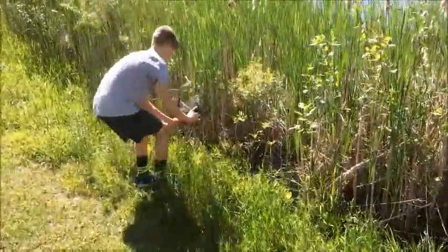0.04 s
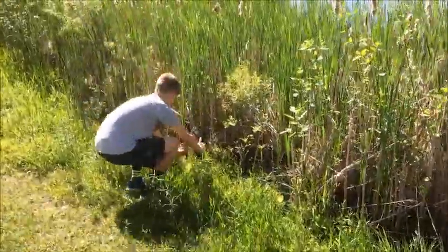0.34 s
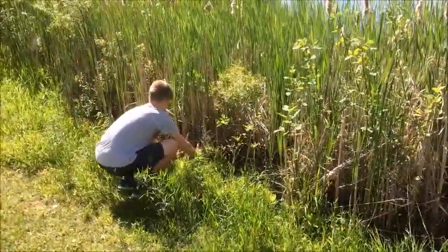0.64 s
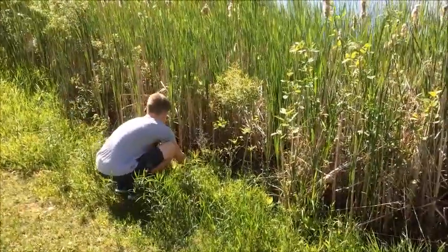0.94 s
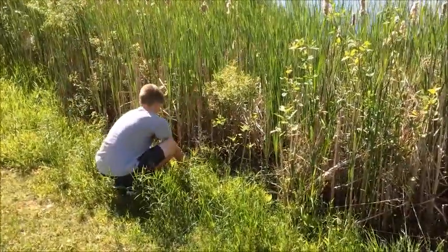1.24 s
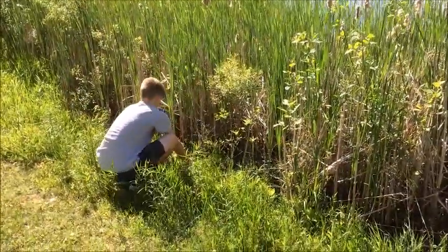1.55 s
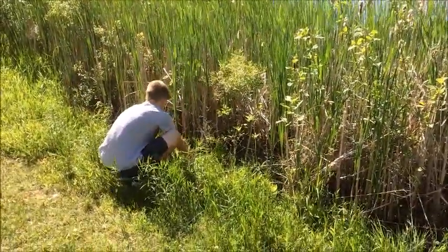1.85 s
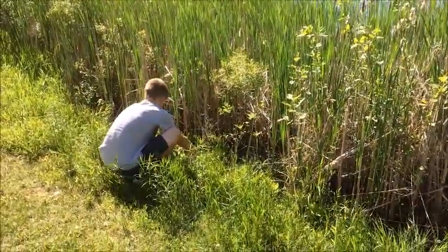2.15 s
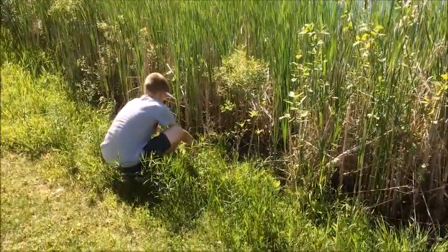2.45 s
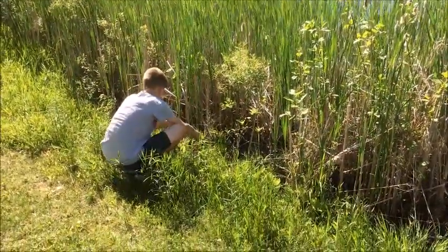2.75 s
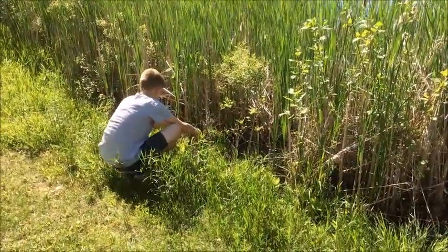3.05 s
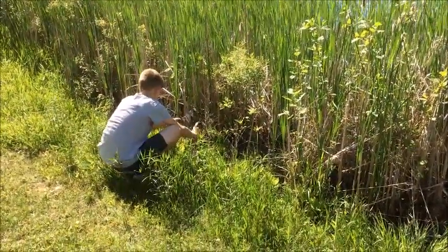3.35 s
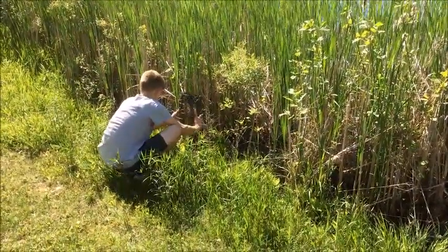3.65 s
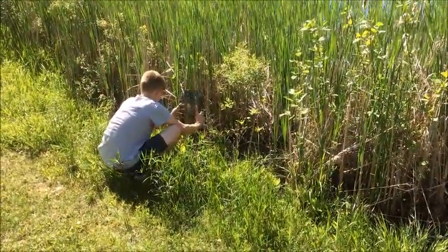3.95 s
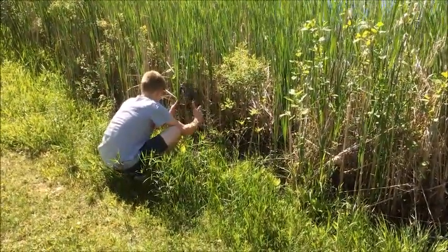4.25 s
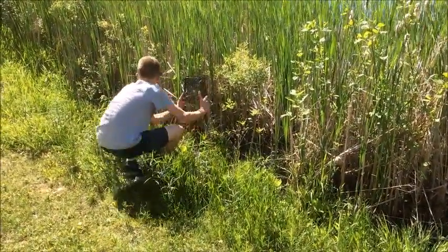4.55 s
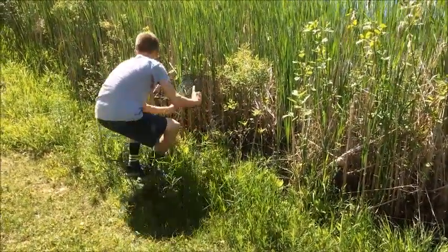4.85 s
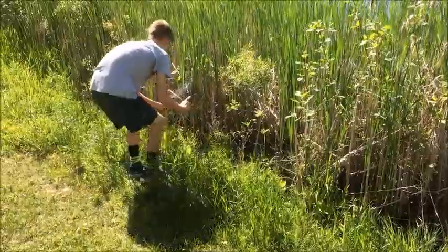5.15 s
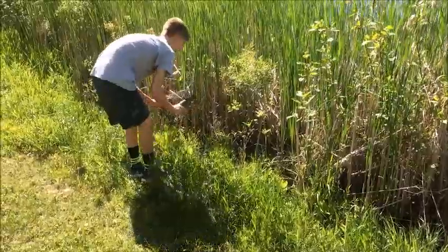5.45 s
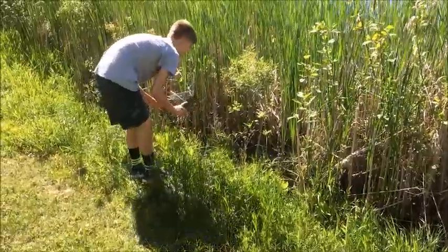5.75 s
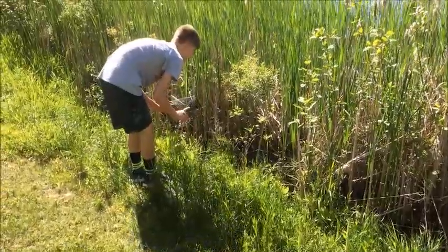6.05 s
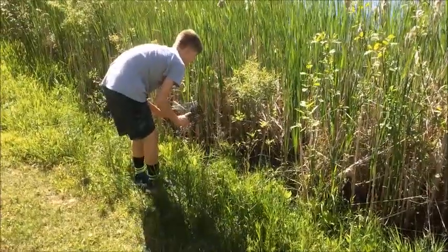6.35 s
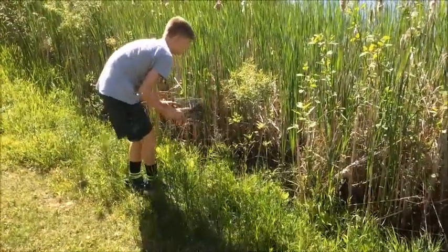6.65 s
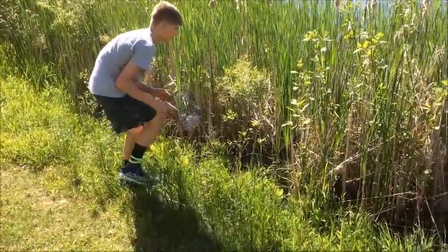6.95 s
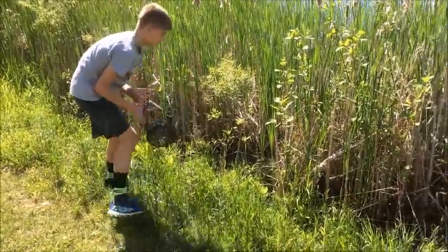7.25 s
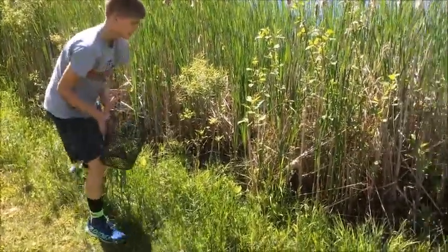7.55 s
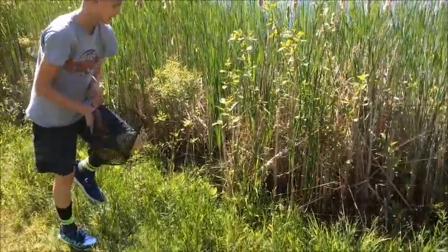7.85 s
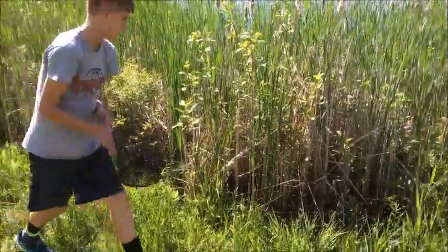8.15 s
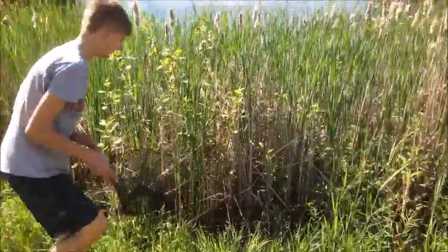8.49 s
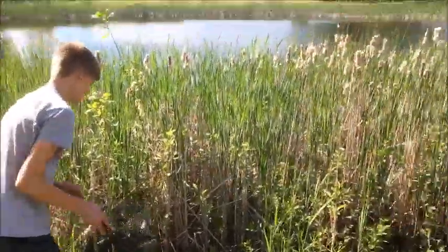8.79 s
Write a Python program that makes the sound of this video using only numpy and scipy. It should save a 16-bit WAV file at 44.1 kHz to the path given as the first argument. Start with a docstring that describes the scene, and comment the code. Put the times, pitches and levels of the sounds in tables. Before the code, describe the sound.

Dry reeds swish and crackle around a net as birds give falling whistles and sharp checks, with light wind on the microphone.

```python
"""At a pond's edge someone works a mesh net out of the reeds: stems swish and snap, a far bird rattles.
Blackbirds cut in with dry 'check' notes and falling alarm whistles that echo off the banks; at 2 s
comes a buzzy trill of fast-repeated syllables. More whistles and a second rattle follow, while a far
hum comes and goes. Past 5 s the breeze bumps the microphone hardest, just before the last two whistles.
Then feet brush through the grass, and a thin, high trill closes the scene."""
import sys
import numpy as np
from scipy import signal
from scipy.fft import rfft, irfft, next_fast_len
from scipy.io import wavfile
from scipy.ndimage import map_coordinates

SR = 44100
rng = np.random.default_rng(int(sys.argv[2]) if len(sys.argv) > 2 else 0)


def file_out(sig):
    """Save sig as 16-bit WAV at sys.argv[1]."""
    # one column per channel
    cols = np.atleast_2d(sig).T
    # limit, then scale
    lim = np.clip(cols, -1, 1)
    pcm = np.round(lim * 32767).astype(np.int16)
    wavfile.write(sys.argv[1], SR, pcm)


N = 393372
TOP_HZ = 15520  # top of the mix
BUZZ_S, THIN_S = .0358, .007  # syllable periods of the buzzy and the thin trill

# alarm whistles: t/s, held f/Hz, plunge depth/Hz, sag/(Hz/s), 2nd partial/dB, 3rd partial/dB,
# water echo delay/s, water echo gain/ratio, send to the far reeds/dB
ALARMS = [(1.181, 3625, 2750, 1034, -46, -39, 0, 0, -16),
          (1.839, 3650, 3500, 1217, -29.5, -32, .00697, 0.78, -22.5),
          (3.077, 3488, 3400, 532, -32, -23.5, 0, 0, -13.5),
          (3.529, 3674, 2800, 1117, -42, -47, 0, 0.33, -14), (5.891, 3600, 3300, 886, -36, -23, 0, 0, -11),
          (6.248, 3661, 3750, 1214, -33, -26.5, .00692, 0.88, -23.5)]
# one envelope per whistle, its last point ending the call: t/s, level/dB
ALARM_ENVELOPES = [
    [(1.181, -50.5), (1.262, -39.5), (1.284, -66), (1.298, -40.5), (1.346, -44), (1.374, -51.5),
     (1.39, -38.5), (1.422, -36.5), (1.44, -43), (1.49, -50)],
    [(1.839, -38), (1.9, -31), (1.95, -32), (2.04, -33.5), (2.14, -37)],
    [(3.076, -51), (3.12, -44), (3.156, -39), (3.168, -44), (3.232, -50), (3.246, -39.5), (3.314, -42),
     (3.325, -48.5), (3.37, -60)],
    [(3.529, -72), (3.556, -53), (3.594, -63), (3.655, -42.5), (3.736, -44), (3.85, -48.5)],
    [(5.892, -55.5), (5.924, -49), (5.945, -44.5), (5.978, -38), (5.996, -55), (6.024, -41), (6.088, -50),
     (6.098, -39.5), (6.165, -43.5)],
    [(6.248, -41.5), (6.275, -35), (6.32, -32.5), (6.43, -34), (6.53, -34.5), (6.558, -40)],
]
# dry 'check' notes: t/s, level/dB
CHECK_CUES = [(0.9164, -32.5), (3.6535, -33.5), (4.6097, -33), (5.36, -53), (5.572, -34), (7.466, -32.5),
              (8.6153, -35)]
# throat resonance of a 'check': f/Hz, level/dB
THROAT_EQ = [(700, -21), (1500, -17.5), (2600, -14), (3300, -7.5), (3750, 2.5), (4350, 2.5), (4750, -12),
             (5200, -10), (5900, -21.5), (13000, -29)]
# clear notes that open a song: t/s, length/s, f/Hz, level/dB
OPENING_NOTES = [(1.655, 0.04, 2058, -50.5), (1.68, 0.033, 2092, -53.5), (1.722, 0.033, 1580, -64),
                 (1.849, 0.044, 1632, -52)]
# trill layers: start/s, end/s, period/s, f/Hz, glide/Hz, rasp/Hz, syllable length/s, level/dB,
# level change over the trill/dB
TRILL_LAYERS = [(1.999, 2.574, BUZZ_S, 3300, -300, 40, 0.019, -38, -10),
                (2.018, 2.59, BUZZ_S, 3400, 0, 60, 0.02, -53, -3),
                (2.039, 2.59, BUZZ_S, 4883, 20, 60, 0.023, -52.5, -0.5),
                (2.02, 2.60, BUZZ_S, 2576, -40, 45, 0.016, -50, -5.5),
                (2.025, 2.603, BUZZ_S, 2845, 100, 131, 0.026, -50.5, -8),
                (8.75, 8.92, THIN_S, 5520, 307, 564, 0.0096, -62, 5.5)]
# a far bird's rattles: t/s, notes/count, first gap/s, gap growth/s, f/Hz, glide/Hz, length/s, level/dB
RATTLE_CUES = [(0.042, 13, .062, .0005, 1135, 140, .026, -55.5),
               (3.842, 14, .0437, .0015, 1085, 320, .03, -60.5)]
# fundamental and octave of a rattle note: level/dB
RATTLE_PARTIALS = [-5, 1.5]
# pulls and strides that stir the stems: t/s, length/s, level/dB
STIR_CUES = [(0, 0.53, -61), (.83, 0.13, -67.5), (.97, 0.57, -61.5), (1.1, 0.07, -54.5),
             (1.65, 0.71, -66.5), (2.5, 0.38, -74.5), (3.47, 0.12, -64), (4.53, 0.21, -71.5),
             (5.75, 0.14, -80), (6.54, 0.36, -67.5), (7.02, 0.49, -71), (8.23, 0.38, -68.5),
             (8.72, 0.22, -69.5)]
# tone of the rustling stems: f/Hz, level/dB
STEM_EQ = [(250, -36), (600, -18), (1500, -7), (3200, -7.5), (6500, -0.5), (9000, -1), (13800, -2),
           (15400, -17)]
# the net scraping a stem: t/s, length/s, level/dB
SCRAPE_CUES = [(0.162, 0.18, -43.5), (0.223, 0.041, -41), (0.266, 0.015, -50), (1.043, 0.15, -50),
               (1.151, 0.036, -41.5), (1.221, 0.0098, -41.5), (1.266, 0.013, -44), (1.674, 0.018, -66),
               (1.881, 0.035, -44), (2.693, 0.015, -51.5), (3.5, 0.029, -54), (4.66, 0.033, -44.5),
               (4.723, 0.03, -50), (6.647, 0.022, -54), (6.826, 0.11, -59.5), (7.615, 0.088, -59),
               (8.182, 0.17, -61), (8.344, 0.051, -60), (8.467, 0.019, -55)]
# dry stems snapping: t/s, level/dB, woody part against the crack/dB
SNAP_CUES = [(0.2644, -16, -20), (0.3295, -30.5, -7), (0.3957, -38, -1), (0.457, -39, -20),
             (0.4756, -35, -4), (0.5705, -41, -11), (0.852, -49, -15), (0.979, -35, -14),
             (1.1068, -19.5, -22), (1.1685, -24, -19), (1.2223, -35, -1), (1.502, -37, 4),
             (1.5332, -32.5, -0.5), (1.6842, -35.5, -9), (1.8925, -22.5, -26), (2.5, -37, -4),
             (2.5795, -42, 7), (2.647, -45, -2), (2.701, -47, -10), (3.469, -36, -22), (3.513, -33.5, -20),
             (4.101, -46, -12), (4.5734, -34.5, -5), (4.669, -37.5, 12), (4.7295, -40.5, 5.5),
             (4.7388, -37, -15), (4.864, -40, -12), (5.172, -41.5, -7), (5.184, -43, -4), (6.659, -43, -4),
             (6.769, -34, -11), (6.8126, -36.5, 1), (7.0796, -39.5, -18), (7.1164, -45, -15),
             (7.5774, -40.5, -12), (8.3145, -37.5, -5), (8.357, -40, -14), (8.4513, -37, -22),
             (8.4662, -30, -16), (8.4855, -31, -9), (8.571, -37.5, -17)]
# squeaks among the wet stems: t/s, length/s, f/Hz, glide/Hz, level/dB
SQUEAK_CUES = [(3.501, 0.015, 1410, -200, -53), (3.945, 0.021, 7440, 491, -50.5),
               (4.967, 0.019, 1595, 603, -51.5), (5.003, 0.023, 4570, 500, -52.5),
               (6.846, 0.026, 5380, 1400, -49)]
# dull knocks, the first right as the scene opens, the rest of net frame and feet: t/s, f/Hz, t60/s, level/dB
KNOCK_CUES = [(0.01, 990, 0.14, -43.5), (0.227, 1080, 0.23, -66), (0.394, 1890, 0.016, -43),
              (1.103, 755, 0.04, -48.5), (1.151, 704, 0.075, -46.5), (1.13, 2590, 0.033, -40.5),
              (7.522, 510, 0.18, -54), (7.954, 1800, 0.022, -50), (8.005, 1870, 0.024, -47.5),
              (8.262, 720, 0.36, -57.5), (8.305, 1470, 0.12, -52), (8.832, 392, 0.32, -55)]
# strength of the breeze: t/s, level/dB
BREEZE_ENVELOPE = [(0.0, -60), (0.4, -66.5), (0.82, -58), (1.19, -69), (2.98, -61), (3.4, -65.5),
                   (3.7, -56), (4.27, -60), (4.55, -69), (4.72, -55), (5.24, -56.5), (5.37, -48.5),
                   (5.59, -46), (5.96, -58), (6.43, -62), (6.61, -55), (7.08, -67), (8.12, -61.5),
                   (8.92, -73)]
# tone of the buffeting: f/Hz, level/dB
BUFFET_EQ = [(15, -50), (28, -9), (50, -2), (72, 1), (105, 0), (175, -14), (350, -33), (800, -75)]
# single eddies on the microphone: t/s, width/s, f/Hz, level/dB
EDDY_CUES = [(1.739, 0.026, 70, -49.5), (2.017, 0.0097, 63.4, -36), (2.13, 0.013, 58.4, -40.5),
             (2.801, 0.0093, 69, -30), (4.349, 0.027, 74, -43.5), (4.732, 0.021, 85, -45),
             (5.001, 0.018, 58.5, -45), (5.191, 0.02, 69, -40), (5.274, 0.011, 74, -29),
             (5.345, 0.0099, 66, -32), (5.448, 0.012, 77, -24.5), (5.452, 0.0081, 187, -43),
             (5.606, 0.017, 76.5, -30), (5.7, 0.0086, 89, -29.5), (5.78, 0.02, 72, -47),
             (6.079, 0.01, 71, -35.5), (6.751, 0.013, 81.4, -45), (7.372, 0.01, 63, -39.5)]
# reverb time of the far banks: f/Hz, t60/s
SHORE_DECAY = [(1500, 1.5), (3500, 1.2), (7000, 0.23), (14000, 0.2)]
# tones of the far hum: f/Hz, level/dB
HUM_TONES = [(153.4, -59), (191, -64.5), (107, -61)]
# swells of the far hum: t/s, length/s, level/dB
HUM_CUES = [(0, 1.1, -6), (3.05, 1.37, 0.5)]
# open-air bed: f/Hz, level/dB
AIR_EQ = [(35, -13), (60, -22), (95, -4), (358, -12.5), (462, -13.5), (519, -14), (654, -11.5),
          (1140, -15.5), (2570, -22), (3480, -21.5), (9430, -39.5), (14300, -65), (15400, -31)]


def whistles(plunge_s=.04, attack_s=.011, release_s=.023, waver=.0033, hoarseness=.035):
    """Alarm calls plunge hoarsely, then sag; returns the direct sound, near-reed send and far send."""
    near, scattered, far = np.zeros((3, N))
    flutter, rasp = wobble(120), wobble(900)
    for alarm, levels in zip(ALARMS, ALARM_ENVELOPES):
        s, hz, plunge_hz, sag, second_db, third_db, water_delay, water_gain, far_db = alarm
        length = levels[-1][0] - s
        t, start = clock(length), round(s * SR)
        glide = hz - sag * t + plunge_hz / (1 + t / plunge_s) ** 3
        shake = hoarseness * np.maximum(np.log2(glide / hz), 0) * rasp[start:][:len(t)]
        pitch = glide * (1 + shake + waver * flutter[start:][:len(t)])
        phase = 2 * np.pi * np.cumsum(pitch) / SR
        partials = enumerate([second_db, third_db, third_db - 19], 2)
        overtones = sum(amp(db) * np.sin(k * phase) * (k * pitch < SR / 2) for k, db in partials)
        richness = np.sqrt(np.abs(np.sin(np.pi * t / length)))  # fullest in mid-call
        gate = np.clip(t / attack_s, 0, 1) * np.clip((length - t) / release_s, 0, 1)
        envelope = np.sqrt(2) * gate * amp(np.interp(s + t, *np.transpose(levels)))
        call = envelope * (np.sin(phase) + richness * overtones)
        water_echo = water_gain * np.interp(t - water_delay, t, call)  # beats against the glide
        add(near, s, call + water_echo)
        add(scattered, s, call * amp(22.5 * np.log2(pitch / hz)))  # the high start scatters more
        add(far, s, amp(far_db) * envelope * np.sin(phase))  # overtones do not carry that far
    return near, scattered, far


def checks(peak_s=.0032, rise_s=.011, fall_s=.016, trim_db=-5):
    """A 'check' is a short, rasping puff of noise in the bird's throat resonance."""
    swell, t = np.zeros(N), np.arange(N) / SR
    for s, db in CHECK_CUES:
        since = t - s - peak_s
        swell += amp(db + trim_db) * np.exp(-(since / np.where(since < 0, rise_s, fall_s)) ** 2)
    rasp = unit(amp(wobble(460)))
    return swell * rasp * noise(THROAT_EQ)


def songs():
    """Birds farther off: a few clear notes, and buzzy trills of one fast-repeated syllable."""
    out = np.zeros(N)
    for s, length, hz, db in OPENING_NOTES:
        add(out, s, amp(db + 7) * chirp(length, hz, 0))
    for first, last, period, hz, glide_hz, rasp_hz, length, db, ramp_db in TRILL_LAYERS:
        for s in np.arange(first, last, period):
            level = db + ramp_db * (s - first) / (last - first) + rng.standard_normal()
            add(out, s, amp(level) * chirp(length, hz, glide_hz, rasp_hz))
    return out


def rattles(rasp_hz=100, blur_db=-4):
    """From across the pond: runs of hoarse, rising notes that slow a little, blurred by the reeds."""
    out = np.zeros(N)
    for first, count, gap, slowing, hz, glide_hz, length, db in RATTLE_CUES:
        for n in range(count):
            s = first + n * (gap + slowing * (n - 1) / 2)
            level = db + rng.standard_normal()
            for k, partial_db in enumerate(RATTLE_PARTIALS, 1):
                add(out, s, amp(level + partial_db) * chirp(length, k * hz, k * glide_hz, k * rasp_hz))
    return out + amp(blur_db) * reed_scatter(out, t60=.95)


def rustle(slips_per_s=4500, spread_db=2.8, rest_db=-75.5, trim_db=6):
    """Leaves slide over the mesh: tiny slips on a soft swish, with crackle and a few harder scrapes."""
    sizes = np.sign(rng.standard_normal(N)) * amp(spread_db * np.minimum(rng.exponential(size=N), 3))
    slips = (rng.random(N) < slips_per_s / SR) * sizes
    grain = unit(coloured(slips, STEM_EQ) + amp(-1) * noise(STEM_EQ))
    stirring = np.hypot(amp(rest_db), swells(STIR_CUES, attack_s=.005, fade_db_per_s=84))
    force = amp(trim_db) * stirring * catches()
    scraping = np.zeros(N)
    for s, length, db in SCRAPE_CUES:
        add(scraping, s, amp(db) * np.sin(np.pi * clock(length) / length) ** 2)
    crackle = amp(-4) * fibres()
    return (force + scraping) * grain + force * crackle


def catches(per_s=30, ease_s=.012, strength=1.1):
    """Stems catch on the mesh and let go: a gain that jumps at random and eases off; rms 1."""
    jerks = (rng.random(N) < per_s / SR) * rng.random(N) * strength
    return unit(1 + signal.lfilter([1], [1, -np.exp(-1 / (ease_s * SR))], jerks))


def fibres(per_s=170, ring_cycles=12, centre_hz=9000, pitch_spread=.27):
    """Dry fibres flick at random, each ringing for an instant at its own pitch; rms 1."""
    when, tuning, softness, phase = np.hsplit(rng.random((int(per_s * N / SR), 4)), 4)
    t = clock(.012)
    hz = centre_hz * np.exp(pitch_spread * np.sqrt(3) * (2 * tuning - 1))
    size = amp(-4 * np.log(np.maximum(softness, .12)))
    rings = size * amp(-60 * t * hz / ring_cycles) * np.sin(2 * np.pi * (hz * t + phase))
    places = (when * N).astype(int) + np.arange(len(t))
    return unit(np.bincount(places.ravel(), rings.ravel(), N)[:N])


def snaps(crack_t60=.0036, splinter_t60=.04, bright_hz=9500, woody_hz=3200, trim_db=-4):
    """A stem cracks at once and its fibres splinter for a moment; thick stems sound lower."""
    out, t = np.zeros(N), clock(.05)
    fade = amp(-60 * t / crack_t60) + amp(-19 - 60 * t / splinter_t60)
    for s, db, woody_db in SNAP_CUES:
        tuning = np.exp(.15 * rng.standard_normal())
        add(out, s, amp(db + trim_db) * burst(fade, tuning * bright_hz, breadth=.6))
        add(out, s, amp(db + woody_db + trim_db) * burst(fade, tuning * woody_hz, breadth=.6))
    return out


def handling():
    """The net is pulled and carried: wet stems squeak, frame and feet give dull knocks."""
    out, t = np.zeros(N), clock(.15)
    for s, length, hz, glide_hz, db in SQUEAK_CUES:
        add(out, s, amp(db) * chirp(length, hz, glide_hz, rasp_hz=.1 * hz))
    for s, hz, t60, db in KNOCK_CUES:
        add(out, s, burst(amp(db - 60 * t / t60), hz, breadth=.35))
    return out


def breeze(trim_db=2, lumpy_db=4.5):
    """Low, lumpy buffeting on the microphone; single eddies push and pull it in soft bumps."""
    t = np.arange(N) / SR
    out = amp(curve(BREEZE_ENVELOPE) + trim_db + lumpy_db * wobble(27)) * noise(BUFFET_EQ)
    for s, width, hz, db in EDDY_CUES:
        out += amp(db) * np.exp(-((t - s) / width) ** 2) * np.sin(2 * np.pi * hz * (s - t))
    return out


def reed_scatter(x, t60=.21, onset_s=.0016):
    """The stand of reeds scatters a call into a short blur."""
    t = clock(.4)
    tail = rng.standard_normal(len(t)) * amp(-60 * t / t60) * (1 - np.exp(-t / onset_s))
    return signal.fftconvolve(x, tail / np.linalg.norm(tail))[:N]


def shore(x):
    """The far banks answer with a long tail whose top end dies first."""
    hz, t, spectra = signal.stft(rng.standard_normal(SR), SR, nperseg=256)
    decay = amp(-60 * t / along(SHORE_DECAY, hz)[:, None])
    _, tail = signal.istft(spectra * decay, SR, nperseg=256)
    return signal.fftconvolve(x, tail / np.linalg.norm(tail))[:N]


def far_hum(drift_hz=5, waver_db=1.9):
    """Something hums far away: three low, wavering tones that come and go."""
    hum = np.zeros(N)
    for hz, db in HUM_TONES:
        phase = 2 * np.pi * np.cumsum(hz + drift_hz * wobble(25)) / SR
        hum += amp(db + waver_db * wobble(14)) * np.sin(phase)
    return swells(HUM_CUES, attack_s=.17, fade_db_per_s=96) * hum


def open_air(level_db=-59.5, waver_db=.63):
    """A soft, nearly steady bed of outdoor murmur."""
    return amp(level_db + waver_db * wobble(10)) * noise(AIR_EQ)


def chirp(length, hz, glide_hz, rasp_hz=0):
    """A short, softly rounded gliding tone; rasp shakes its pitch."""
    t = clock(length)
    shake = np.interp(t, np.arange(40) / 600, rng.standard_normal(40))
    pitch = hz + glide_hz * (t / length - .5) + rasp_hz * shake
    return np.sin(np.pi * t / length) ** 2 * np.sin(2 * np.pi * np.cumsum(pitch) / SR)


def burst(fade, hz, breadth):
    """Noise in one resonance under a dying envelope, with the energy of that envelope."""
    band_hz = [hz / (1 + breadth), min(hz * (1 + breadth), TOP_HZ)]
    body = signal.butter(1, band_hz, "band", fs=SR)
    hiss = rng.standard_normal(2 * len(fade))
    ring = signal.lfilter(*body, signal.lfilter(*body, hiss))[len(fade):]
    return unit(ring * fade) * np.sqrt(np.mean(fade ** 2))


def swells(cues, attack_s, fade_db_per_s):
    """Gain of overlapping cues (t/s, length/s, level/dB): each rises, holds and dies away."""
    t = np.arange(N) / SR
    gains = [np.clip((t - s) / attack_s, 0, 1) * amp(db - fade_db_per_s * np.maximum(t - s - length, 0))
             for s, length, db in cues]
    return np.linalg.norm(gains, axis=0)


def amp(db):
    """Decibels as a gain."""
    return 10 ** (np.asarray(db) / 20)


def unit(x):
    """x at rms 1."""
    return x / np.sqrt(np.mean(x ** 2) + 1e-20)


def along(points, hz):
    """Read (f/Hz, value) points on a log axis."""
    f, values = np.transpose(points)
    return np.interp(np.log(hz + 1), np.log(f + 1), values)


def curve(points):
    """(t/s, value) points as one value per sample."""
    return np.interp(np.arange(N) / SR, *np.transpose(points))


def clock(length):
    """Sample times of a sound of this length."""
    return np.arange(int(length * SR)) / SR


def wobble(rate):
    """A smooth random curve, rate knots a second."""
    return map_coordinates(rng.standard_normal(int(N * rate / SR) + 4), [np.arange(N) * rate / SR])


def filtered(x, response):
    """x through a frequency response."""
    size = next_fast_len(N + SR // 2)
    return irfft(rfft(x, size) * response(np.fft.rfftfreq(size, 1 / SR)), size)[:N]


def coloured(x, eq):
    """x through an EQ curve (f/Hz, level/dB), at rms 1."""
    return unit(filtered(x, lambda hz: amp(along(eq, hz))))


def noise(eq):
    """Coloured noise of rms 1."""
    return coloured(rng.standard_normal(N), eq)


def add(track, s, sound):
    """Mix a sound into the track at time s."""
    i = max(round(s * SR), 0)
    track[i:i + len(sound)] += sound[:max(N - i, 0)]


def scene():
    """Birds direct, through the reeds and off the banks, over the net, breeze, hum and open air."""
    alarm, scattered_alarm, far_alarm = whistles()
    check = checks()
    song = songs() + rattles()
    reed_send = amp(-16) * scattered_alarm + amp(-15) * check + amp(-4) * far_alarm + amp(-7) * song
    blur = reed_scatter(reed_send, t60=.22)
    echo = shore(far_alarm + amp(-24) * check + amp(-23) * song)
    add(echo, .33, amp(-11.5) * reed_scatter(far_alarm))  # one distinct slap off the bank
    birds = alarm + check + song + blur + echo
    foley = rustle() + snaps() + handling()
    return (birds + foley + breeze() + far_hum() + open_air())[None]


def record(dry):
    """A brick-wall low-pass on the mono mix."""
    return filtered(dry[0], lambda hz: hz < TOP_HZ)[None]


dry = scene()
out = record(dry)
file_out(out)
```